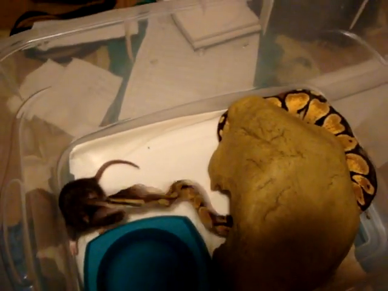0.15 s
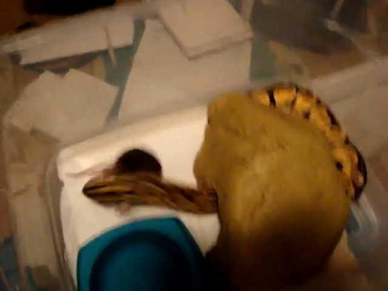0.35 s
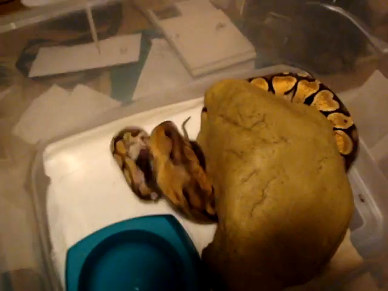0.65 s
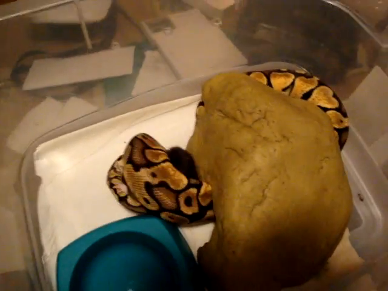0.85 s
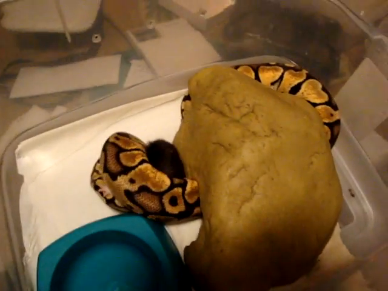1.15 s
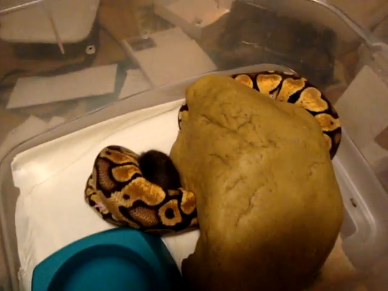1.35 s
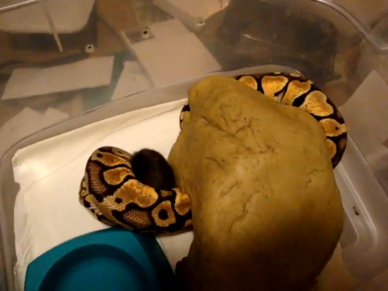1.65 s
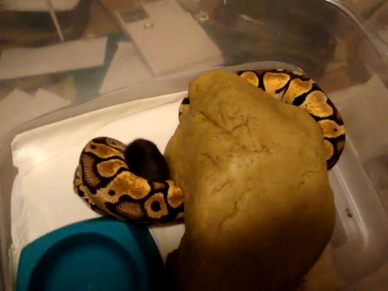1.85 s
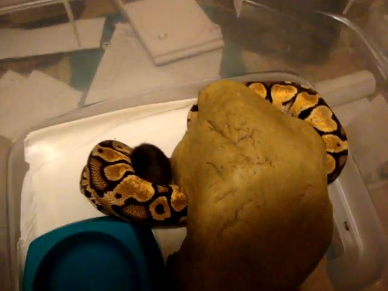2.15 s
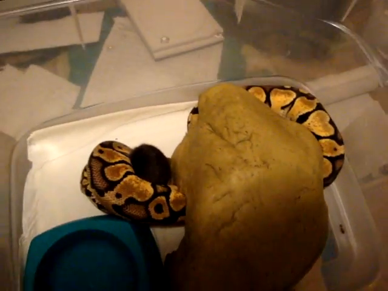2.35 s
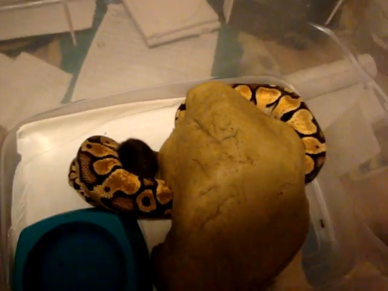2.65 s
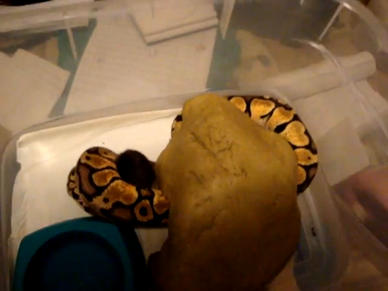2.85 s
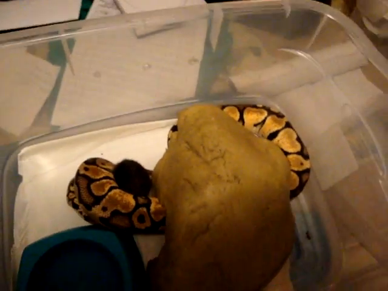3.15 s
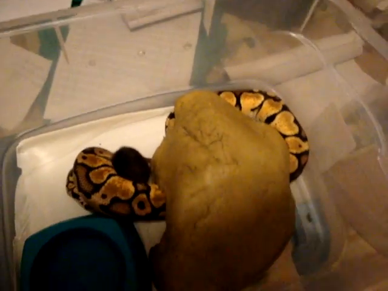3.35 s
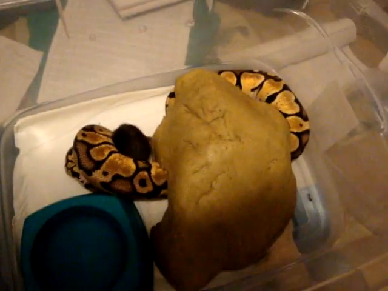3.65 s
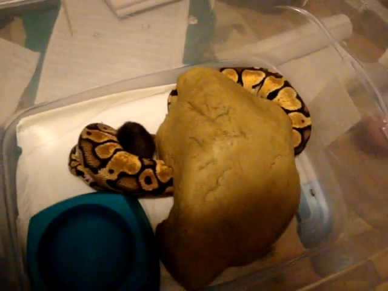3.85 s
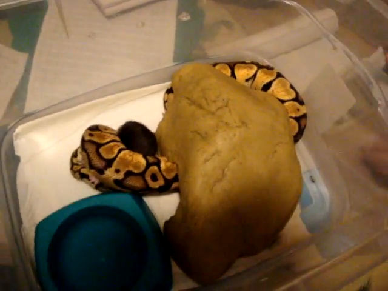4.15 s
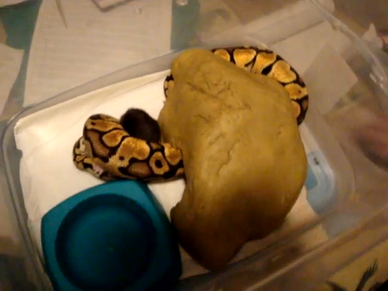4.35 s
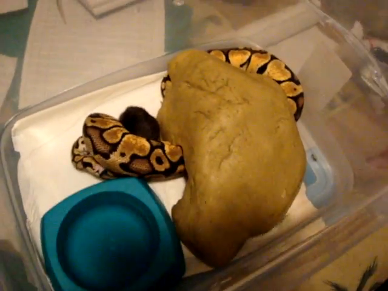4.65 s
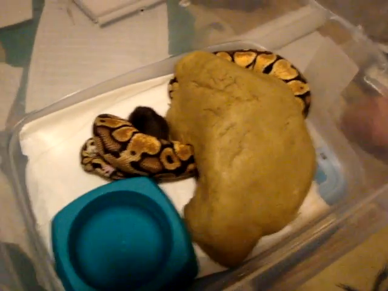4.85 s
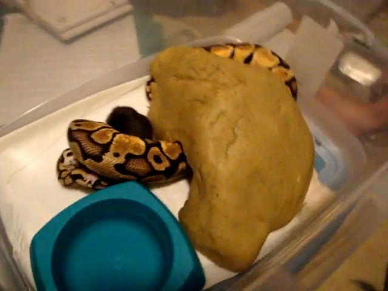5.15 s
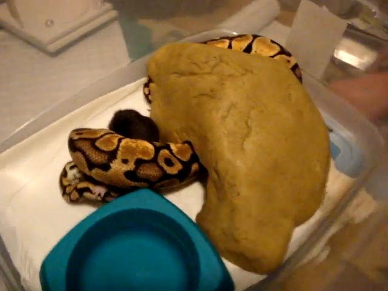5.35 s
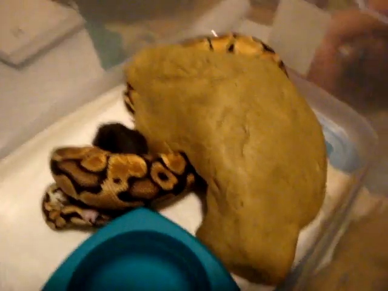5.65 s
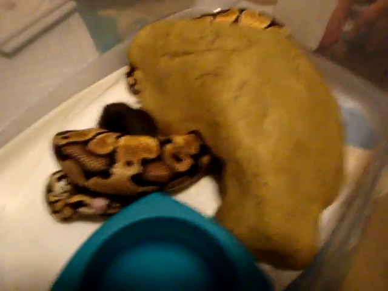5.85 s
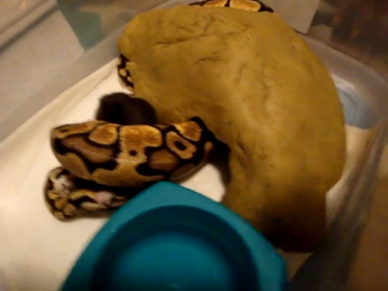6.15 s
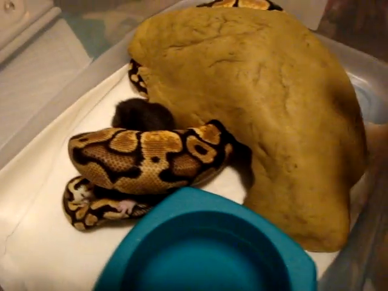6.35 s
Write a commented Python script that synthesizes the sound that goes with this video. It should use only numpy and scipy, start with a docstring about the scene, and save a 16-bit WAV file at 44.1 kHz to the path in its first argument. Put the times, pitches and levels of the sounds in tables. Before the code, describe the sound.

At about 0.2 seconds a quick cluster of hollow bumps sounds on a plastic tub as a snake seizes a rat. The rat squeals, high and shrill: the longest, loudest cry runs from 0.4 to 0.7 seconds, turning from a hoarse scream into a clearer whistle. Shorter raspy cries follow at 0.8, 1.2 and 2 seconds, with a very faint one near 1.5. After a couple of light taps, bodies knock and slide against the tub from 3.1 to 3.6 seconds. A sharp knock just before 4.2 seconds leads straight into a short, clearer squeak and a faint trailing one. Another firm knock lands at 4.5, then softer bumps and scuffs. Small claw ticks and light knocks come between 5.7 and 6.2 seconds. Everything sounds close, with slight room echo, over a faint hum and hiss that dips after the first cries and slowly returns.

```python
"""A rat bumps the wall of a plastic tub, making it ring, and cries five times in about two seconds.
Its vocal folds buzz, from hoarse screams to clear whistles, and its throat and mouth shape the tone.
Bodies then knock and slide against the tub. Just after four seconds come a short, clearer cry and a
faint one. More knocks, scuffs and ticking claws follow. A quiet room hums and hisses all the while."""
import sys
import numpy as np
from scipy import signal
from scipy.fft import rfft, irfft, next_fast_len
from scipy.io import wavfile
from scipy.ndimage import uniform_filter1d, map_coordinates

SR = 44100
rng = np.random.default_rng(int(sys.argv[2]) if len(sys.argv) > 2 else 0)


def to_wav(sig):
    """Store sig (one row per channel, or 1-D mono) as 16-bit WAV at the path in sys.argv[1].

    Samples outside -1..1 are clipped; the rate is SR.
    """
    pcm = np.clip(np.atleast_2d(sig), -1, 1) * 32767
    pcm = np.round(pcm).astype(np.int16)
    wavfile.write(sys.argv[1], SR, pcm.T)  # frames by channels


N = 287045

# Levels in the tables are relative: the functions add their own gains.
# The cries: throat boost/dB, mouth resonance half-width/Hz, then rows of
# t/s, pitch/Hz, level/dB, roughness (0 clear, 1 hoarse), half-pitch share, mouth f/Hz, mouth boost/dB
CRIES = [ (-7.5, 890, [(.371, 3138, -14.5, 0.38, 0.4, 6400, 7.5), (.385, 3275, -19.5, 0.4, 0.1, 6500, 10.5),
         (.396, 2780, -22.5, .58, .2, 5600, 8), (.455, 2680, -22.5, .55, .2, 5400, 8),
         (.47, 2480, -22, .68, .5, 6300, 6), (.495, 2470, -20.5, .72, .5, 6300, 4),
         (.553, 2550, -29.5, 0.77, 0.2, 8300, 5), (.563, 2685, -17.5, 0, 0, 5300, 22.5),
         (.574, 2650, -21.5, 0.2, 0.24, 5360, 18), (.582, 2700, -21, 0.5, 0.5, 5500, 9.5),
         (.612, 2860, -17, 0.48, 0, 5600, 24.5), (.62, 2480, -20.5, 0.2, 0, 5220, 21.5),
         (.627, 2700, -15.5, 0, 0.1, 5300, 26), (.635, 2400, -25.5, 0.08, 0, 7200, 6.5),
         (.648, 2070, -25, 0.24, 0, 6400, 16.5), (.661, 2246, -24.5, 0.3, 0.3, 6500, 6.5)]),
         (5.5, 1800, [(.818, 1801, -31.5, 0.4, 0, 7200, 12.5), (.837, 1877, -23.5, 0.01, 0, 7500, 20),
         (.85, 1883, -33, .3, 0, 7800, 10), (.882, 2100, -25.5, 0.62, 1, 7300, 26),
         (.914, 2050, -46, 1.1, 0.7, 8200, 23), (.945, 2050, -31, 0.4, 1, 7300, 20.5),
         (.968, 2030, -40.5, 0.1, 0.9, 7800, 18)]), (2.5, 1800, [(1.204, 1940, -30, .8, 0, 7400, 10.5),
         (1.222, 1844, -22, 0.4, 0, 7300, 11.5), (1.235, 1830, -22, .5, .9, 7000, 9),
         (1.272, 1830, -19.5, .52, .9, 7000, 9), (1.28, 2170, -20, .56, .5, 7200, 8),
         (1.345, 2150, -23.5, .6, .4, 7800, 5), (1.365, 1968, -28.5, .5, 0, 6000, -0.5)]),
         (9, 2000, [(1.545, 2496, -46, 0.3, 0.6, 8050, -12), (1.555, 2260, -46, 0.8, 1, 8000, -19),
         (1.585, 1886, -53, 0.8, 0.3, 8000, -14)]), (4, 550, [(1.988, 2336, -46, 0.64, .6, 2400, 15),
         (2.0, 2413, -26, 0.2, 0.7, 4700, 2), (2.007, 1774, -27, 0.6, 0, 3480, 7),
         (2.022, 1760, -19.5, 0.59, .8, 6000, 11), (2.038, 1750, -22.5, 0.4, 1, 5800, 9),
         (2.047, 1818, -21, 0, .1, 3700, 26), (2.06, 1802, -23, 0.12, 0.1, 5400, 5),
         (2.072, 1915, -19, 0, 1.1, 6600, 15), (2.082, 1783, -26, 0.26, 0.9, 6100, 7),
         (2.09, 1940, -20.5, 0.09, 1.2, 4800, 11), (2.11, 1828, -28.5, 0.24, 1, 4000, 18),
         (2.128, 1880, -50.5, 0.4, 0.8, 3730, 10)]), (22, 1800, [(4.206, 1980, -34, .25, 0, 9200, 18),
         (4.216, 2010, -27.5, .1, 0, 9200, 30), (4.231, 1950, -28, .16, 0, 8800, 31),
         (4.241, 1700, -36, .6, 0, 8400, 26)]), (15, 2000, [(4.257, 2430, -50, .4, 0.1, 8000, -12),
         (4.275, 1780, -44.5, .4, 0, 8000, -8)]), ]
# What the throat lets through: f/Hz, level/dB
THROAT = [(410, -45), (700, -24), (1280, -12.5), (2480, -1), (2910, 0), (4020, 0), (5030, -5), (6440, -2.5),
          (8150, -4), (10200, -13.5), (13300, -57), (22000, -120)]
# A second throat vibration in two screams: start/s, end/s, first pitch/Hz, last pitch/Hz, level/dB
SECOND_VOICE = [(0.389, .462, 3407, 3450, -27), (.455, .555, 4060, 3860, -25),
                (1.243, 1.352, 3580, 3764, -30.5)]
# Bodies hitting the tub: t/s, level/dB, thud/dB, crack/dB, most strongly struck f/Hz
KNOCKS = [(0.215, -12, -12, -26, 780), (0.218, -10.5, -12, -13.5, 705), (0.231, 0, -28, -16, 1070),
          (0.27, -4.5, -10.5, -16, 558), (0.676, -21, -45, -9.5, 702), (0.709, -22.5, -30, -16.5, 1010),
          (2.172, -35, -18, -14.5, 870), (2.471, -36.5, -5, -7, 880), (3.088, -11.5, -31.5, -8.5, 856),
          (3.099, -12.5, -10.5, -37.5, 850), (3.112, -17, -21, -38, 660), (3.227, -17, -10, -44, 875),
          (3.41, -21.5, -8, -14, 840), (3.427, -11, -34, -17.5, 740), (3.457, -18, -14.5, -22, 825),
          (3.464, -22, -10, -14.5, 870), (3.509, -23.5, -4, -18.5, 303), (4.021, -42.5, 8.5, -3, 337),
          (4.158, -3.5, -12.5, -15, 1300), (4.171, -13, -35, -34, 1290), (4.184, -20, -22, -23, 1270),
          (4.51, -6.5, -42, -9.5, 865), (4.529, -13, -34, -15.5, 890), (4.593, -21.5, -28, -18.5, 573),
          (5.081, -35, -9, -22, 567), (5.197, -31.5, -10, -12, 564), (5.985, -22.5, -41, -19, 960),
          (6.121, -22, -15, -19, 555), (6.158, -30.5, -5.5, -15, 810)]
# The notes the tub rings at: f/Hz, level/dB, ring time as a multiple of RING_S
TUB_NOTES = [(251, -23, 0.58), (430, -5, 1.6), (563, -3, 1.44), (675, -4.5, 1.47), (891, -3.5, 1.03),
             (1060, 4.5, 0.54), (1262, -0.5, 0.69), (1704, -3, 0.96), (2156, -3.5, 0.28), (2550, -20, .5),
             (3300, -26, .45), (4500, -15, .4)]
# The rattle of the walls: f/Hz, level/dB
WALL_RATTLE = [(59, -58), (100, -23), (165, -14.5), (452, -24), (571, 2.5), (1000, 5), (1100, -0.5),
               (2050, -3), (5820, -32), (10200, -52), (13300, -73), (22000, -120)]
# The first snap of a blow: f/Hz, level/dB
CRACK = [(900, -42.5), (2200, 12.5), (4500, 5), (7000, -6), (10200, -18)]
# The low shaking of the tub: f/Hz, level/dB
RUMBLE = [(60, -46.5), (130, -11.5), (200, -7), (250, -1), (310, -5), (450, -7.5), (900, -17),
          (1800, -57.5)]
# The knocks carry little deep bass: f/Hz, level/dB
KNOCK_BASS_LOSS = [(30, -40), (90, -16), (170, 0), (20000, 0)]
# Claws on plastic: t/s, level/dB, centre f/Hz, time to fade by 60 dB/s
TICKS = [(0.9818, -40, 3520, 0.013), (1.461, -40.5, 2320, 0.014), (1.5197, -39, 2320, 0.032),
         (1.913, -34.5, 2980, 0.0086), (4.0239, -28.5, 2754, 0.028), (4.3885, -31, 9210, 0.017),
         (5.7182, -23.5, 4990, 0.011), (5.876, -34, 5000, 0.0079), (5.907, -35, 5500, 0.0074),
         (5.934, -17, 5400, 0.017), (5.949, -20.5, 2940, 0.0037), (5.9756, -33.5, 5000, 0.02),
         (5.985, -22.5, 4820, 0.016), (6.0852, -25, 5620, 0.013)]
# Scales and fur sliding on the tub: start/s, end/s, rumble/dB, rasp/dB, change by the end/dB
SCUFFS = [(0.304, 0.401, -39, -30, -1.5), (0.486, 0.519, -60, -32, -15), (3.127, 3.188, -41, -41, -17),
          (3.203, 3.41, -53, -46.5, 2), (3.514, 3.609, -41.5, -50.5, -20), (4.068, 4.163, -54.5, -58, 24.5),
          (4.191, 4.357, -53, -47.5, -4.5), (4.54, 4.682, -54, -41, -14), (5.195, 5.3, -52.5, -43.5, -18.5),
          (5.592, 5.8, -63, -49.5, -0.5), (5.99, 6.075, -64, -53.5, -4)]
# The scratchy part of sliding: f/Hz, level/dB
RASP = [(250, -20), (450, -7.5), (800, 0), (1200, -5), (2400, -7), (4500, -14), (7000, -22.5), (10200, -28)]
# The room's echo: f/Hz, time to fade by 60 dB/s
ECHO_TIMES = [(200, .3), (2000, 0.61), (10000, 0.35)]
# A set curve for the recorder turning the background down and slowly back up: t/s, level/dB
BACKGROUND_LEVEL = [(0, -54), (.2, -52.5), (.75, -63.5), (1.15, -65), (1.88, -57), (3, -55.5), (3.7, -50),
                    (4.3, -53), (5, -52), (6.51, -52.5)]
# The room's low hum and its hiss: f/Hz, level/dB
HUM = [(12, -75), (20, -33.5), (145, -14), (288, -5), (359, -1.5), (414, -8), (538, -4.5), (1160, -10),
       (1850, -16.5), (2500, -32.5), (3250, -50), (5500, -120)]
HISS = [(710, -14.5), (1200, -0.5), (1840, -8.5), (1930, -2), (5310, -6.5), (10200, -14.5), (13300, -30),
        (22000, -120)]

RISE_DB_PER_S, FALL_DB_PER_S, CRY_EDGE_S = 4000, 1506, .03  # the fades before and after a cry
RING_S, RATTLE_DB = 0.032, -14.5  # the tub's base time to fade by 60 dB; rattle within a knock
HISS_DB, HISS_FOLLOWS = -55.5, 0.4  # average hiss; dB of hiss per dB of background change


def rat():
    """The rat's seven cries, each placed at its own time."""
    out = np.zeros(N)
    for throat_db, width_hz, rows in CRIES:
        span = np.arange(round((rows[0][0] - CRY_EDGE_S) * SR), round((rows[-1][0] + CRY_EDGE_S) * SR))
        out[span] += cry(throat_db, width_hz, rows, span / SR)
    return out


def cry(throat_db, width_hz, rows, t):
    """Vocal folds make a stack of overtones; roughness shakes them and smears them into noise."""
    pitch, db, rough, half_share, *mouth = curves(rows, t)
    db -= RISE_DB_PER_S * np.clip(rows[0][0] - t, 0, None)
    db -= FALL_DB_PER_S * np.clip(t - rows[-1][0], 0, None)
    rough, n = np.clip(rough, 0, 1), len(t)
    shake = (0.003 + 0.0223 * rough) * wobble(140, n) + 0.055 * rough * wobble(800, n)
    phase = 2 * np.pi * np.cumsum(pitch * (1 + shake) / 2) / SR
    # Multiples of half the pitch: the odd ones sound when strong and weak vibrations take turns.
    k = np.arange(1, 13)[:, None]
    sizes = throat_gain(k * pitch / 2, pitch, throat_db, width_hz, *mouth)
    sizes *= np.where(k % 2, np.clip(half_share, 0, 1.5), 1)
    flutter = amp((1 + 3 * rough) * np.array([wobble(420, n) for _ in k]))
    overtones = unit(flutter) * sizes * np.cos(k * phase + rng.uniform(0, 2 * np.pi, k.shape))
    tone = np.sum(overtones, axis=0) / np.sqrt(np.sum(sizes ** 2, axis=0) / 2)

    hz, frame_times, noise = signal.stft(rng.standard_normal(n), SR, nperseg=192)
    frame_pitch, _, _, _, *frame_mouth = curves(rows, t[0] + frame_times)
    bands = amp(4 * np.cos(2 * np.pi * hz[:, None] / frame_pitch))  # noise gathers at the overtones
    shape = bands * throat_gain(hz[:, None], frame_pitch, throat_db, width_hz, *frame_mouth)
    breath = unit(signal.istft(noise * shape / np.linalg.norm(shape, axis=0), SR, nperseg=192)[1][:n])
    throb = unit(amp(.8 * wobble(180, n)))
    noise_share = rough ** 1.47
    return amp(db) * throb * (np.sqrt(1 - noise_share) * tone + np.sqrt(noise_share) * breath)


def throat_gain(hz, pitch, throat_db, width_hz, mouth_hz, mouth_db):
    """The mouth's resonance moves freely, while the throat's stays tuned to the pitch."""
    mouth = mouth_db / (1 + ((hz - mouth_hz) / width_hz) ** 2)
    throat = throat_db / (1 + ((hz - pitch) / 450) ** 2)
    return amp(along(THROAT, hz) + mouth + throat)


def second_voice():
    """A second vibration in the throat adds a shaky, gliding tone and its octave."""
    out = np.zeros(N)
    for start, end, first_hz, last_hz, db in SECOND_VOICE:
        t = np.arange(round(start * SR), round(end * SR)) / SR
        n = len(t)
        pitch = np.linspace(first_hz, last_hz, n) * (1 + 0.02 * wobble(100, n) + 0.04 * wobble(800, n))
        phase = 2 * np.pi * np.cumsum(pitch) / SR
        tone = sum(amp(level_db + 2.8 * wobble(300, n)) * np.cos(k * phase)
                   for k, level_db in enumerate((-1.5, -.5), 1))
        fade = np.clip(np.minimum(t - start, end - t) / 0.008, 0, 1)  # 8 ms in and out
        out[round(t[0] * SR):][:n] += amp(db) * unit(tone) * fade
    return out


def knocks():
    """A blow rings the tub's notes, favouring those near the struck one, with a rattle, thud and crack."""
    out, t = np.zeros(N + SR), np.arange(SR // 4) / SR
    onset = 1 - np.exp(-t / 0.00077)
    for start, db, thud_db, crack_db, struck_hz in KNOCKS:
        ring = np.zeros(len(t))
        for hz, level_db, ring_scale in TUB_NOTES:
            note_db = level_db + rng.normal(0, 5.55) - 19 * abs(np.log2(hz / struck_hz))
            note_hz = hz * (1 + rng.normal(0, 0.04))
            ring += amp(note_db - 60 * t / (ring_scale * RING_S)) * np.sin(2 * np.pi * note_hz * t)
        rattle = amp(RATTLE_DB - 60 * t / 0.15) * shaped_noise(WALL_RATTLE, len(t))
        thud = amp(thud_db + 0.5 - 60 * t / 0.083) * shaped_noise(RUMBLE, len(t))
        crack_fade = amp(-60 * t / 0.0094) + 0.17 * amp(-60 * t / 0.11)
        crack = amp(crack_db + 6.5) * crack_fade * shaped_noise(CRACK, len(t))
        out[round(start * SR):][:len(t)] += amp(db - 5.5) * ((ring + rattle + thud) * onset + crack)
    return coloured(out[:N], KNOCK_BASS_LOSS)


def claw_ticks():
    """A sharp claw tick on plastic: a snap of noise that rises fast and dies away."""
    out, t = np.zeros(N + SR), np.arange(-130, SR // 10) / SR  # the tick peaks at t = 0
    for when, db, hz, fade_s in TICKS:
        band = [(hz / 4, -30), (hz / 1.43, -8), (hz, 0), (hz * 1.1, -6), (hz * 4, -20)]
        fade_db = -60 * np.where(t > 0, t / fade_s, -t / 0.0055)
        out[round((when + t[0]) * SR):][:len(t)] += amp(db - 2.5 + fade_db) * shaped_noise(band, len(t))
    return out[:N]


def scuffs():
    """Sliding shakes the tub floor and rasps in uneven grains; each stroke swells or fades."""
    out, t = np.zeros(N), np.arange(N) / SR
    rumble = unit(amp(2 * wobble(40, N)) * patchy_noise(RUMBLE, patchy_db=2))
    rasp = unit(amp(3 * wobble(120, N) + 2 * wobble(25, N)) * patchy_noise(RASP, patchy_db=2.5))
    for start, end, rumble_db, rasp_db, change_db in SCUFFS:
        contact = np.clip(np.minimum(t - start, end - t) / .008 + 1, 0, 1)
        stroke = contact * amp(change_db * np.clip((t - start) / (end - start), 0, 1))
        out += stroke * (amp(rumble_db) * rumble + amp(rasp_db) * rasp)
    return out


def room_echo(x):
    """The room sends the sound back a little later; each frequency dies away at its own speed."""
    hz, t, noise = signal.stft(rng.standard_normal(SR // 2), SR, nperseg=256)
    tail = signal.istft(noise * amp(-60 * t / along(ECHO_TIMES, hz)[:, None]), SR, nperseg=256)[1]
    return signal.fftconvolve(np.pad(x, (300, 0)), tail / np.linalg.norm(tail))[:N]


def background():
    """Low room hum and hiss, turned down by the recorder after the loud cries and slowly coming back."""
    level_db, = curves(BACKGROUND_LEVEL, np.arange(N) / SR)
    hum = amp(level_db + wobble(8, N)) * patchy_noise(HUM, patchy_db=1.5)
    hiss_db = HISS_DB + HISS_FOLLOWS * (level_db - level_db.mean())
    return hum + amp(hiss_db) * patchy_noise(HISS, patchy_db=.5)


def amp(db):
    """Turn decibels into a number to multiply by."""
    return 10 ** (np.asarray(db) / 20)


def unit(x):
    """Scale x to an average strength (rms) of 1."""
    return x / np.sqrt(np.mean(x ** 2) + 1e-20)


def along(points, hz):
    """Read between (f/Hz, value) points, with octaves evenly spaced."""
    f, values = np.transpose(points)
    return np.interp(np.log(hz + 1), np.log(f + 1), values)


def curves(rows, t):
    """Read each column after the time column at times t."""
    times, *columns = np.transpose(rows)
    return [np.interp(t, times, column) for column in columns]


def wobble(rate, size):
    """A smooth curve through `rate` random points a second."""
    return map_coordinates(rng.standard_normal(int(size * rate / SR) + 4), [np.arange(size) * rate / SR])


def coloured(x, spectrum):
    """Turn each frequency of x up or down as the spectrum says."""
    m = next_fast_len(len(x) + 2048)
    return irfft(rfft(x, m) * amp(along(spectrum, np.fft.rfftfreq(m, 1 / SR))), m)[:len(x)]


def shaped_noise(spectrum, size):
    """Steady noise with the given spectrum."""
    return unit(coloured(rng.standard_normal(size), spectrum))


def patchy_noise(spectrum, patchy_db):
    """Noise with louder and softer patches across time and frequency."""
    noise = signal.stft(rng.standard_normal(N), nperseg=512)[2]
    patches = uniform_filter1d(uniform_filter1d(rng.standard_normal(noise.shape), 6, 0), 10, 1)
    uneven = signal.istft(noise * amp(patchy_db * unit(patches)), nperseg=512)[1][:N]
    return unit(coloured(uneven, spectrum))


def scene():
    """The rat, the tub and the room, the same in both channels."""
    near = rat() + second_voice() + knocks() + claw_ticks()
    mono = near + amp(-27.0) * room_echo(near) + scuffs() + background()
    return np.array([mono, mono])


def record(dry):
    """A small microphone loses the deep bass, and the highest treble is cut off."""
    bass_hz, top_hz = 60, 10200
    m = next_fast_len(N + 2048)
    hz = np.fft.rfftfreq(m, 1 / SR)
    bass_cut = 1j * hz / (bass_hz + 1j * hz)
    return irfft(rfft(dry, m) * bass_cut * (hz < top_hz), m)[:, :N]


dry = scene()
out = record(dry)
to_wav(out)
```